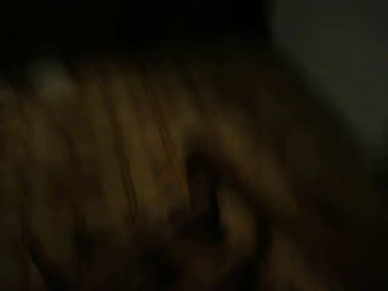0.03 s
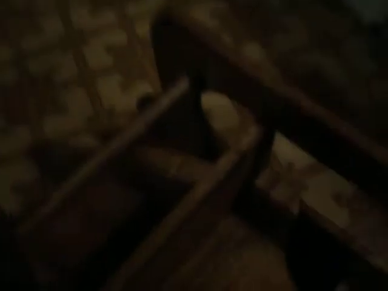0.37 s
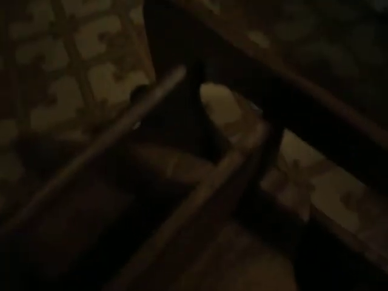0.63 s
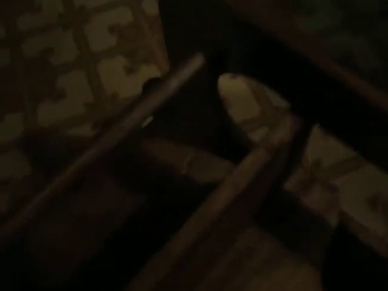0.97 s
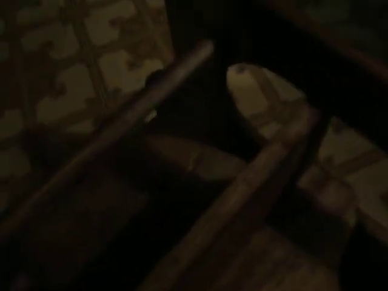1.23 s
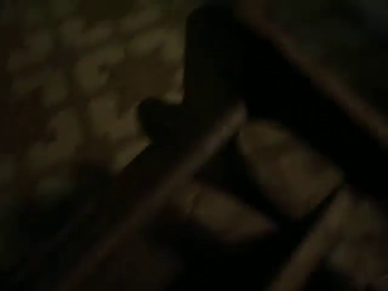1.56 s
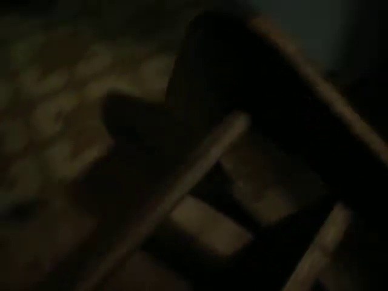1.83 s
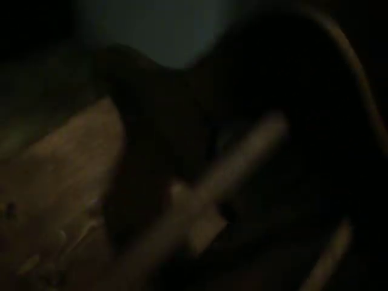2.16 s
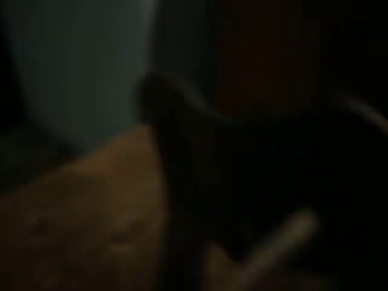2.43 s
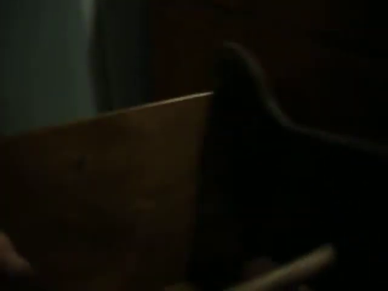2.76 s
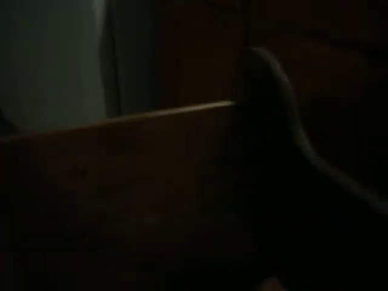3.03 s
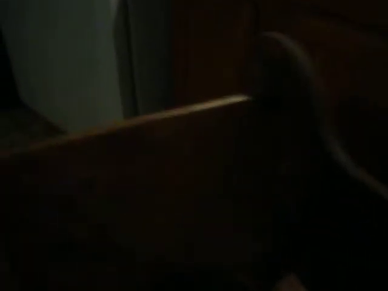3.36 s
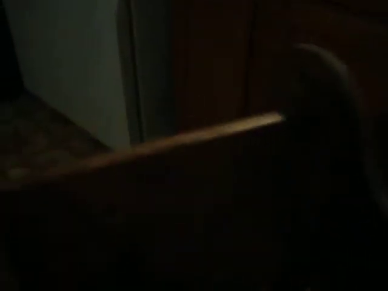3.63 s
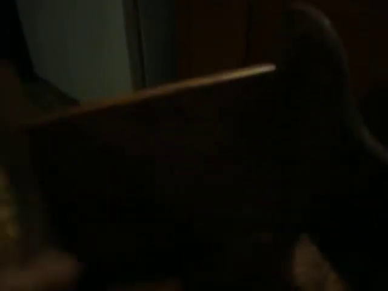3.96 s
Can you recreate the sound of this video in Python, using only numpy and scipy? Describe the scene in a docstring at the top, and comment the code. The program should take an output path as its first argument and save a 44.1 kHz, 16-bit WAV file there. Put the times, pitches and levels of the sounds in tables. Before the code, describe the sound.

A heavy wooden bench is shoved over tiles close by in a small room. Short groaning scrapes give way to a few bumps, a longer grinding slide and a last push with a hard knock.

```python
"""A small room with a tiled floor, where a heavy wooden bench is shoved along, close by.
Its feet stick and slip: short shoves, a long slide and a last push grind through the boards,
with brief groans and a few light taps. The frame bumps, then knocks hard enough to overload
a microphone that rings near 4 kHz and passes little above 6 kHz. A faint hiss lies underneath."""
import sys
import numpy as np
from scipy import signal
from scipy.fft import rfft, irfft
from scipy.io import wavfile
from scipy.ndimage import uniform_filter1d

SR = 44100
rng = np.random.default_rng(int(sys.argv[2]) if len(sys.argv) > 2 else 0)


def int16_out(signal):
    """Quantize to a 16-bit WAV file."""
    q = np.round(np.clip(np.atleast_2d(signal).T, -1, 1) * 32767)
    wavfile.write(sys.argv[1], SR, q.astype(np.int16))


N = 176400
T = np.arange(N) / SR
TAIL = T[:SR // 2]  # time within one event or echo


def undb(db):
    """Decibels to gain."""
    return np.exp(np.asarray(db) * np.log(10) / 20)


def unit(x):
    """Scale to rms 1."""
    return x / np.sqrt(np.mean(x ** 2))


def unit_onset(x):
    """Scale a hit so that its first 20 ms have rms 1."""
    return x / np.sqrt(np.mean(x[:SR // 50] ** 2))


def through(x, response):
    """Pass a sound through an impulse response."""
    return signal.oaconvolve(x, response)[:len(x)]


def colour(x, eq):
    """Minimum-phase EQ from (freq_hz, gain_db) points that keeps the power of white noise."""
    hz, db = np.array(eq, float).T
    size = 4096
    bins_hz = np.maximum(np.fft.rfftfreq(size, 1 / SR), 1)
    gain = undb(np.interp(np.log(bins_hz), np.log(hz), db))
    cepstrum = irfft(np.log(gain))
    cepstrum[1:size // 2] *= 2
    cepstrum[size // 2 + 1:] = 0
    response = irfft(np.exp(rfft(cepstrum)))
    return through(x, response / np.linalg.norm(response))


def resonate(x, hz, width_hz):
    """One resonance, applied twice for steep skirts."""
    b, a = signal.iirpeak(hz, hz / width_hz, fs=SR)
    return signal.lfilter(b, a, signal.lfilter(b, a, x))


def wander(rate_hz):
    """Smooth random drift with rms 1."""
    span = max(int(SR / rate_hz), 2)
    return unit(uniform_filter1d(uniform_filter1d(rng.standard_normal(N), span), span))


def fade(t60_s):
    """Exponential decay from time zero."""
    return np.exp(-np.log(1000) * TAIL / t60_s)


def burst(t60_s):
    """A dying burst of noise."""
    return rng.standard_normal(len(TAIL)) * fade(t60_s)


def add(out, start_s, x):
    """Mix a sound in at its start time."""
    i = int(start_s * SR)
    out[i:i + len(x)] += x[:N - i]


# Tone of the noise bed: freq_hz, gain_db
HISS_EQ = [(20, -10.5), (60, -4), (200, -4.5), (480, 1), (1000, -7), (2500, -7.5), (3950, -3), (5000, -10),
           (6200, -37)]


def hiss():
    """A faint, steady bed of noise."""
    return undb(-42) * colour(rng.standard_normal(N), HISS_EQ)


def room(x, t60_s=.48, predelay_s=.012, wet_db=-12):
    """Tiles and walls add diffuse reflections to the direct sound."""
    reverb = burst(t60_s) * (TAIL > predelay_s)
    return x + undb(wet_db) * through(x, reverb / np.linalg.norm(reverb))


def friction(slips_per_s=2200, spread_db=4, smooth_db=-1, judder_hz=70, judder_db=1):
    """The grain of wood on tile: tiny uneven slips over smooth rubbing, under juddering pressure."""
    slips = (rng.random(N) < slips_per_s / SR) * rng.choice([-1, 1], N)
    sizes = undb(spread_db * np.clip(rng.standard_normal(N), -2, 2))
    smooth = undb(smooth_db) * rng.standard_normal(N)
    pressure = undb(judder_db * wander(judder_hz))
    return unit((unit(slips * sizes) + smooth) * pressure)


# Fader curves of the opening rustle and the long slide: time_s, level_db
RUSTLE_FADER = [(0, -32), (.02, -33), (.038, -25), (.06, -30), (.086, -39), (.2, -41), (.26, -38.5),
                (.33, -42.5), (.45, -39), (.51, -42), (.7, -61)]
SLIDE_FADER = [(1.2, -56), (1.28, -42), (1.335, -42), (1.36, -65), (1.44, -52), (1.456, -37.5), (1.5, -50),
               (1.66, -50), (1.708, -36.5), (1.8, -37), (1.99, -29.5), (2.14, -29.5), (2.23, -29.5),
               (2.42, -35.5), (2.54, -32), (2.58, -37), (2.68, -36), (2.85, -64)]
# Tone of each contact: freq_hz, gain_db
RUSTLE_EQ = [(24, -49.5), (40, -21.5), (135, -21), (237, -6.5), (275, -18), (690, -19.5), (887, -9),
             (1290, -15.5), (1560, -9.5), (2530, -19.5), (3840, 0), (5960, -31.5), (7750, -60.5),
             (13100, -120)]
SLIDE_EQ = [(40, -23), (100, -17), (200, -14), (318, -12), (500, -3), (620, -6), (816, -3.5), (1350, -7.5),
            (2400, -9), (3200, -7), (4000, -1), (4800, -10), (5400, -17), (6100, -33)]


def rubbing(grain):
    """Continuous friction: a light rustle first, later the long slide."""
    out = np.zeros(N)
    for fader, eq in (RUSTLE_FADER, RUSTLE_EQ), (SLIDE_FADER, SLIDE_EQ):
        times, db = np.array(fader).T
        level = undb(np.interp(T, times, db, left=-100, right=-100))
        out += colour(grain * level, eq)
    return out


# Wood resonances: pitch_hz, width_hz, peak_s, spread_s, level_db
BOARD_RESONANCES = [(720, 260, 1.06, .055, -29.5), (420, 160, .8, .025, -32), (500, 330, 1.88, .12, -40),
                    (520, 110, 2.64, .04, -39), (900, 220, 2.74, .04, -38), (500, 100, 2.28, .25, -40),
                    (1530, 110, 2.25, .08, -42), (2650, 180, 2.24, .08, -36), (3190, 140, 2.25, .07, -33.5),
                    (4050, 400, 2.23, .08, -35), (2020, 80, 2.52, .05, -42), (2570, 120, 2.5, .06, -42),
                    (3740, 140, 2.51, .045, -32.5), (520, 70, 3.42, .1, -38)]


def singing_boards():
    """Friction excites resonances in the boards that swell and fade as the feet slide."""
    grain, out = friction(), np.zeros(N)
    for hz, width, peak, spread, db in BOARD_RESONANCES:
        swell = np.exp(-.5 * ((T - peak) / spread) ** 2)
        out += undb(db) * swell * unit(resonate(grain, hz, width))
    return out


# Light catches of a leg: start_s, pitch_hz, width_hz, level_db
LEG_TAPS = [(2.537, 270, 150, -38), (2.644, 4150, 600, -32), (2.931, 450, 220, -32.5)]


def leg_taps():
    """A leg catches on the tiles with a hollow tap or a thin tick."""
    out = np.zeros(N)
    for start, hz, width, db in LEG_TAPS:
        tap = resonate(burst(t60_s=.17), hz, width)
        add(out, start, undb(db) * unit_onset(tap))
    return out


# Groaning notes: start_s, length_s, pitch_hz, level_db
FOOT_GROANS = [(.716, .04, 590, -25), (.766, .045, 440, -24), (.775, .04, 660, -28)]


def foot_groans(ramp_s=.008, sag_hz_per_s=1500, wobble_depth=.025, drop_db=-9):
    """Regular stick-slip gives a short, rough note that sags as the foot slows."""
    out = np.zeros(N)
    wobble = 1 + wobble_depth * wander(rate_hz=200)
    for start, length, hz, db in FOOT_GROANS:
        pitch = hz - sag_hz_per_s * np.minimum(TAIL, length)
        pitch *= wobble[int(start * SR):][:len(TAIL)]
        tone = np.sqrt(2) * np.sin(2 * np.pi * np.cumsum(pitch) / SR)
        gate = np.clip(np.minimum(TAIL, length + ramp_s - TAIL) / ramp_s, 0, 1)
        level = undb(db + drop_db * np.minimum(TAIL / length, 1))
        add(out, start, gate * level * tone)
    return out


# Scrape cues: start_s, attack_s, hold_s, release_s, level_db, swell_db
FIRST_SHOVES = [(.531, .004, 0.11, 0.04, -27, -1), (.708, .007, .01, .07, -27, 0.5),
                (.765, .002, .02, 0.13, -22, -3.5), (.815, 0.0057, .028, 0.01, -28.5, -4),
                (.902, .007, .145, 0.21, -22, 2), (1.195, 0.024, 0.013, 0.55, -32.5, -1.5)]
SHORT_DRAG = [(2.665, 0.042, .058, .085, -25, 0)]
LAST_PUSH = [(3.06, .005, .05, .16, -24.5, -2), (3.225, .065, .085, .07, -25, -1),
             (3.375, .06, .06, .18, -22, 4), (3.595, 0.0089, 0.017, .08, -24, 0),
             (3.68, .04, .14, .05, -31, -1)]
# Tone of each move: freq_hz, gain_db
SHOVE_EQ = [(24, -56), (40, -28.5), (205, -27), (263, -28.5), (346, -7.5), (392, -10.5), (435, -4.5),
            (548, -13.5), (621, 1), (690, -12.5), (799, -1.5), (925, -15), (1140, -11.5), (1240, -28),
            (1350, -10), (1630, -14), (2090, -10), (2690, -15), (2990, -8), (3460, -10), (3840, -1.5),
            (5040, -18.5), (5960, -39), (7750, -72), (13100, -120)]
DRAG_EQ = [(24, -44), (40, -14.5), (82, -28), (181, -15), (263, -28.5), (392, -11), (634, -12.5),
           (690, 1.5), (750, -14.5), (944, -0.5), (1070, -13.5), (1700, -7.5), (2370, -14), (4000, -3.5),
           (4830, -14.5), (5960, -37.5), (7750, -67), (13100, -120)]
PUSH_EQ = [(24, -63), (40, -22), (143, -31), (232, -15.5), (280, -29), (353, -12.5), (514, -1), (571, -9),
           (799, -4.5), (964, -15.5), (1050, -11), (1240, -13), (1730, -10.5), (2580, -16), (4000, -2),
           (5960, -36), (7750, -74), (13100, -120)]


def scrapes(grain):
    """Each scrape breaks loose, swells or eases while the push lasts, and dies away."""
    out = np.zeros(N)
    for cues, eq in (FIRST_SHOVES, SHOVE_EQ), (SHORT_DRAG, DRAG_EQ), (LAST_PUSH, PUSH_EQ):
        power = np.zeros(N)
        for start, attack, hold, release, db, swell_db in cues:
            rise = np.clip(TAIL / attack, 0, 1)
            held_db = db + swell_db * np.clip((TAIL - attack) / hold, 0, 1)
            fall_db = 20 * np.maximum(TAIL - attack - hold, 0) / release
            add(power, start, (rise * undb(held_db - fall_db)) ** 2)
        out += colour(grain * np.sqrt(power), eq)
    return out


# Blows on the frame: start_s, thud_db, crack_db, boom_db
FRAME_HITS = [(1.324, -62, -65, -42), (1.368, -33, -60, -34), (1.418, -35, -55, -37),
              (1.462, -25, -42, -33), (1.481, -28, -60, -37), (1.586, -39, -60, -43),
              (3.058, -21, -24, -28), (3.065, -24, -21, -28), (3.102, -31.5, -33, -28),
              (3.543, -3.5, -21, -23), (3.561, -11, -25, -26), (3.577, -16, -33, -25),
              (3.596, -17, -19, -20), (3.611, -18, -27, -31), (3.733, -32, -50, -40)]
# Ringing modes of the frame: pitch_hz, level_db, t60_s
FRAME_MODES = [(108.9, -14, .35), (180, -11, .27), (228, -11, .22), (334, 0, .13), (434, 0, .22),
               (501, -1, .21), (558, -3, .2), (625, -12, .22), (703, -12, 0.22), (851, -12, .22),
               (1020, -13.5, 0.13), (1244, -18, 0.15)]
# Tone of each layer of a knock: freq_hz, gain_db
PUNCH_EQ = [(30, -16), (70, -9), (150, -3), (300, 0), (450, -1), (750, -13), (1500, -30), (6000, -60)]
CHATTER_EQ = [(30, -13), (60, -7), (110, 0), (190, 0), (250, -5), (340, -0.5), (540, 0), (780, -3),
              (1000, -11), (1600, -19), (3000, -35), (6000, -61)]
CRACK_EQ = [(60, -16), (300, -6.5), (600, 1), (1000, 0), (1500, -1), (2100, -6), (2900, -2.5), (3900, 0),
            (4600, -4.5), (5500, -16), (6200, -41)]
BOOM_EQ = [(20, -8), (50, -2), (75, -5), (105, 0), (180, -8), (300, -17), (800, -37), (6000, -78.5)]


def frame_knocks(punch_db=-8, ring_db=-4.5, chatter_db=-3):
    """A blow layers a thud (blunt punch, ringing frame, dull chatter), a rattling crack and a low boom."""
    thuds, cracks, booms = np.zeros((3, N))
    punch = colour(signal.unit_impulse(len(TAIL)), PUNCH_EQ)
    ring = sum(undb(db) * np.sin(2 * np.pi * hz * TAIL) * fade(t60) for hz, db, t60 in FRAME_MODES)
    body = undb(punch_db) * unit_onset(punch) + undb(ring_db) * unit_onset(ring)
    for start, thud_db, crack_db, boom_db in FRAME_HITS:
        chatter = undb(chatter_db) * unit_onset(colour(burst(t60_s=.06), CHATTER_EQ))
        add(thuds, start, undb(thud_db) * (chatter - body))
        add(cracks, start, undb(crack_db) * burst(t60_s=.2))
        add(booms, start, undb(boom_db) * burst(t60_s=.36))
    return thuds + colour(cracks, CRACK_EQ) + colour(booms, BOOM_EQ)


def scene():
    """The bench scrapes, slides and knocks in the room, over a faint hiss, in mono."""
    scrape_grain, rub_grain = friction(), friction()
    shoving = scrapes(scrape_grain) + foot_groans()
    sliding = rubbing(rub_grain) + singing_boards()
    return (hiss() + room(shoving + sliding + leg_taps() + frame_knocks()))[None]


def record(dry, band_hz=6110, ceiling=.705, top_hz=15800):
    """A narrow-band microphone overloads, rounding the loudest peaks off flat."""
    narrow = signal.sosfilt(signal.ellip(8, .3, 70, band_hz, fs=SR, output="sos"), dry)
    saturated = narrow / (1 + (narrow / ceiling) ** 8) ** (1 / 8)
    return signal.sosfilt(signal.ellip(8, .1, 70, top_hz, fs=SR, output="sos"), saturated)


dry = scene()
out = record(dry)
int16_out(out)
```